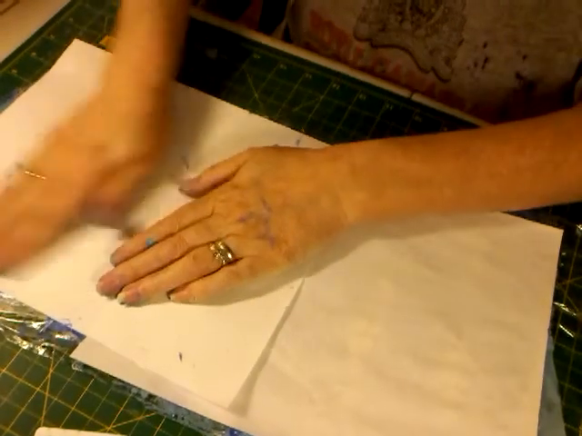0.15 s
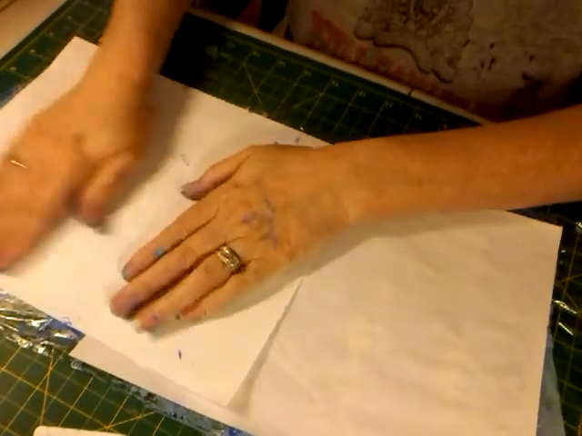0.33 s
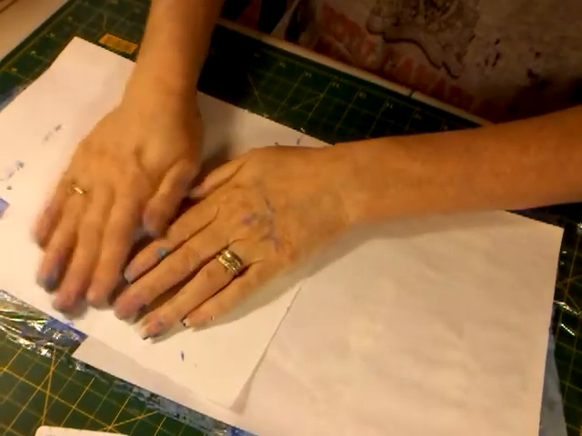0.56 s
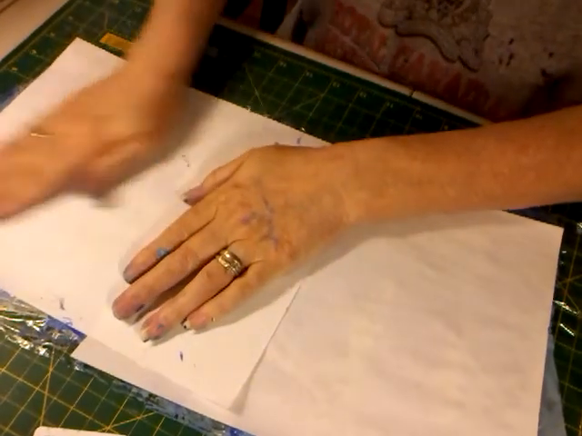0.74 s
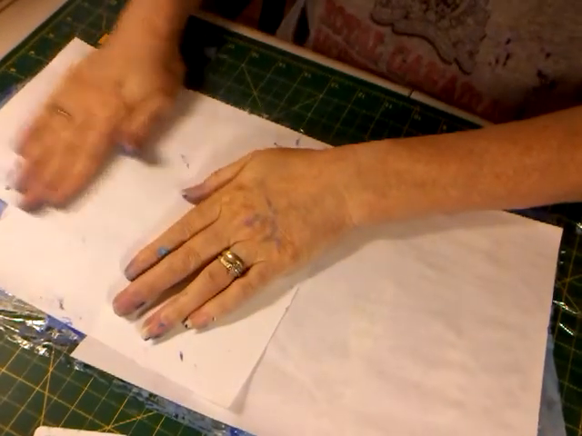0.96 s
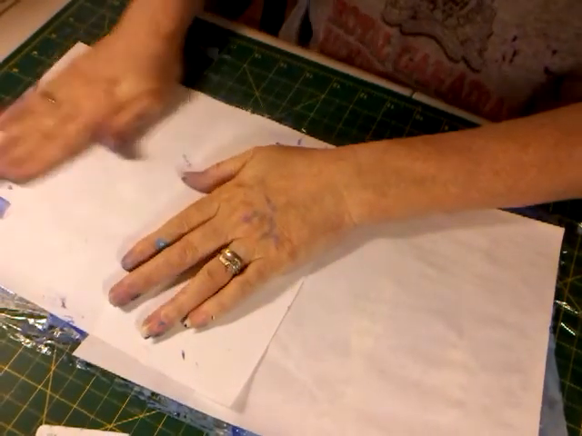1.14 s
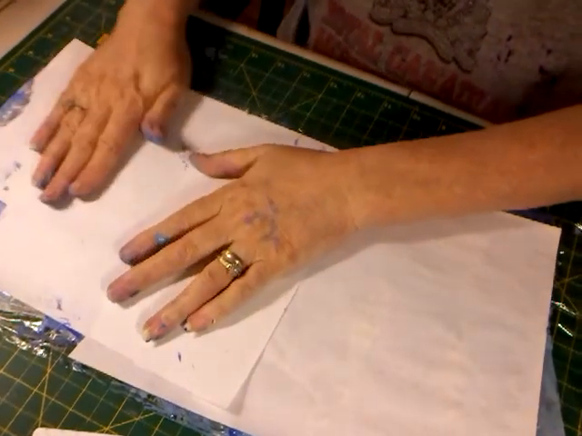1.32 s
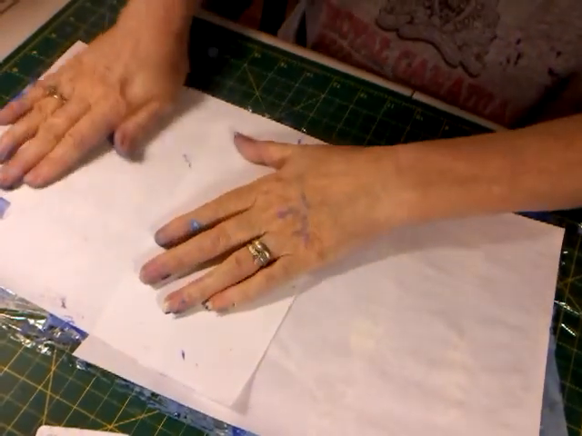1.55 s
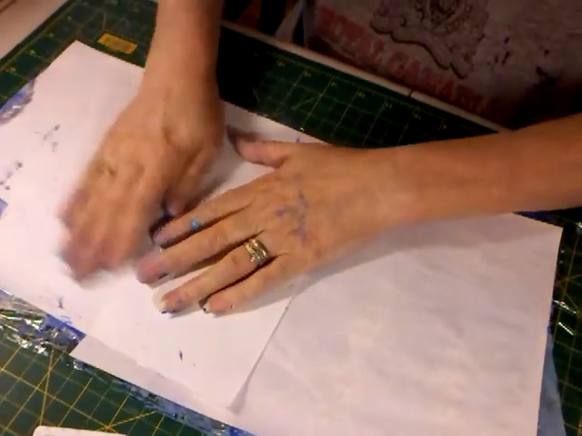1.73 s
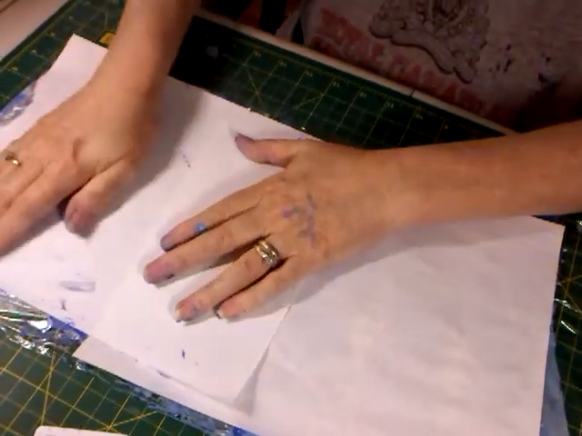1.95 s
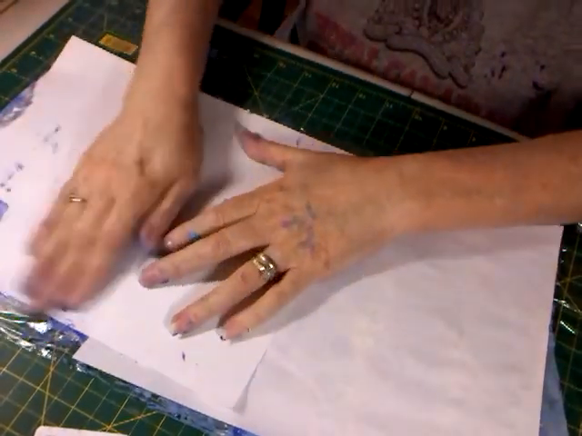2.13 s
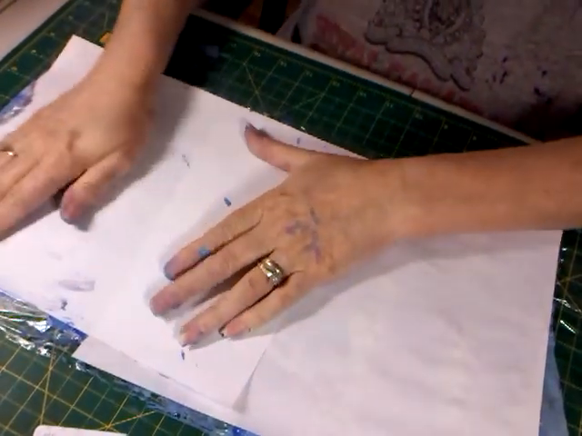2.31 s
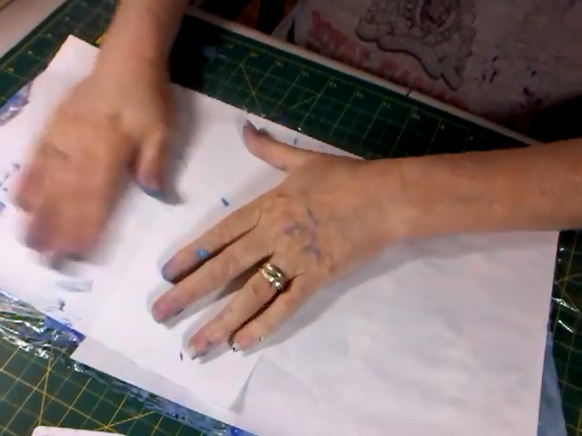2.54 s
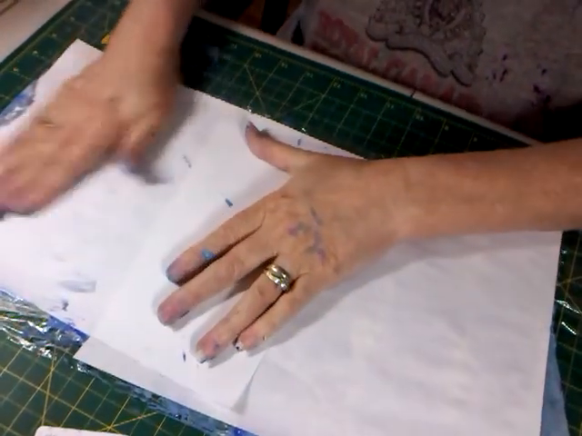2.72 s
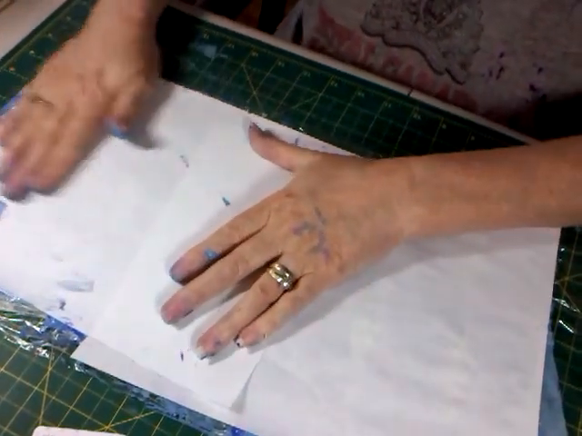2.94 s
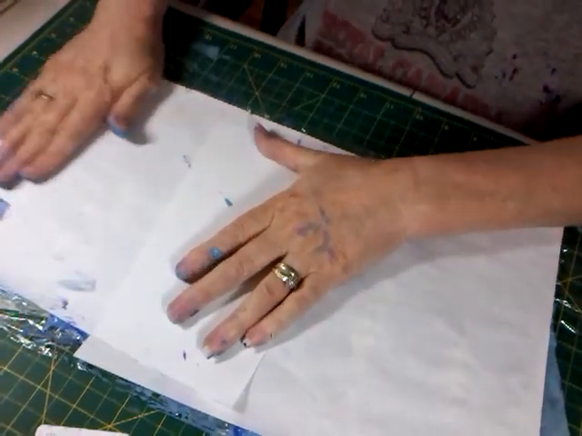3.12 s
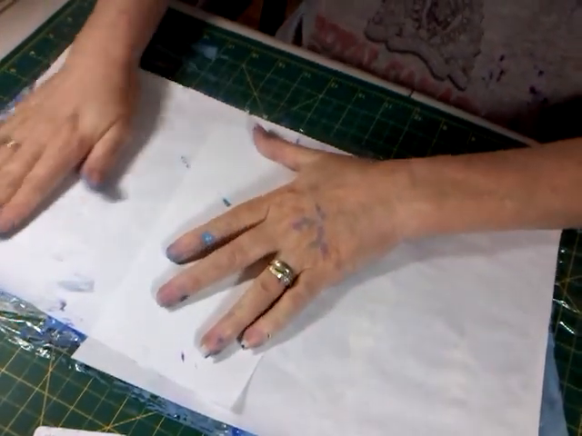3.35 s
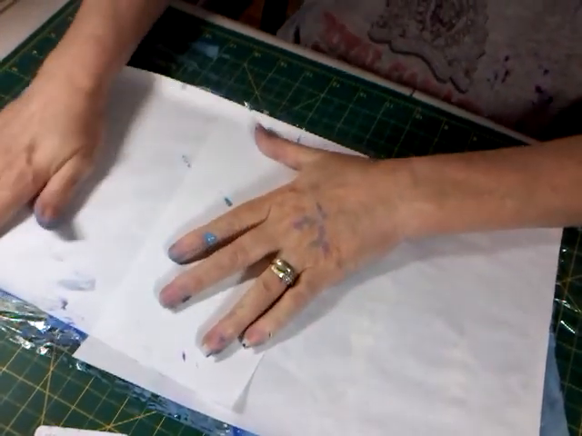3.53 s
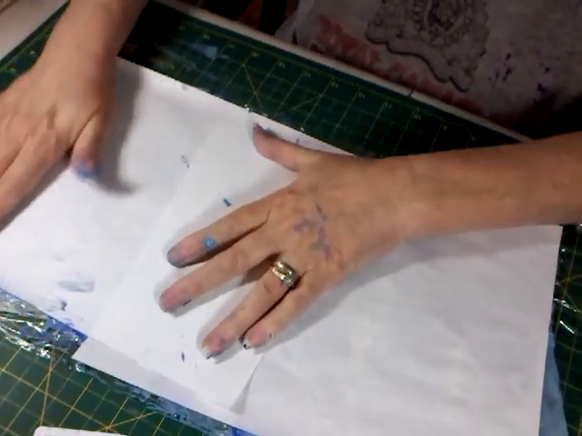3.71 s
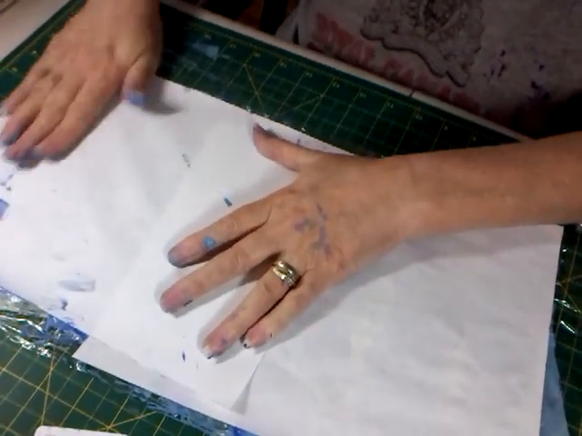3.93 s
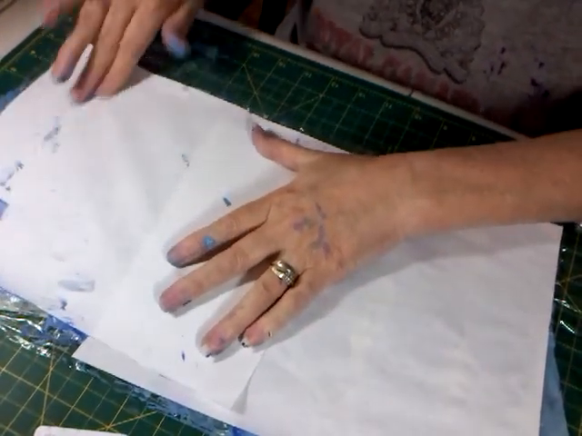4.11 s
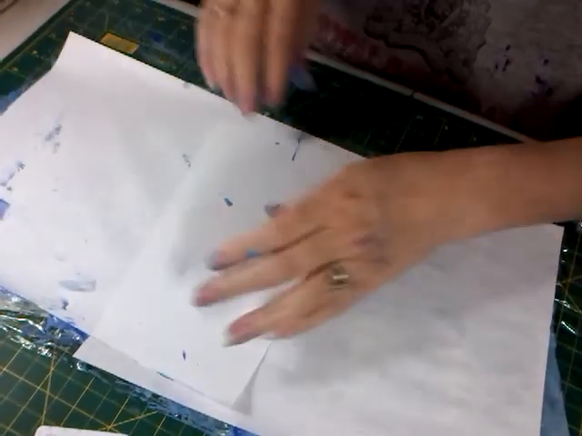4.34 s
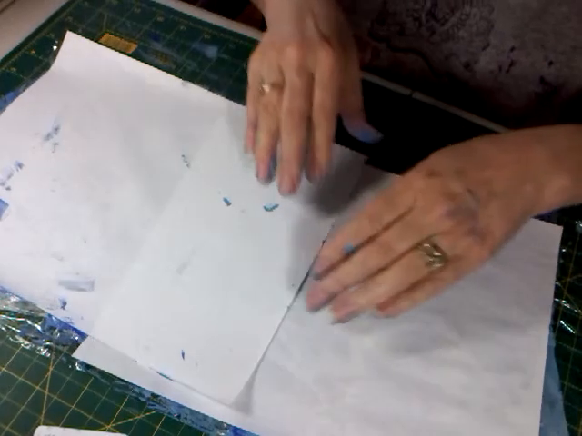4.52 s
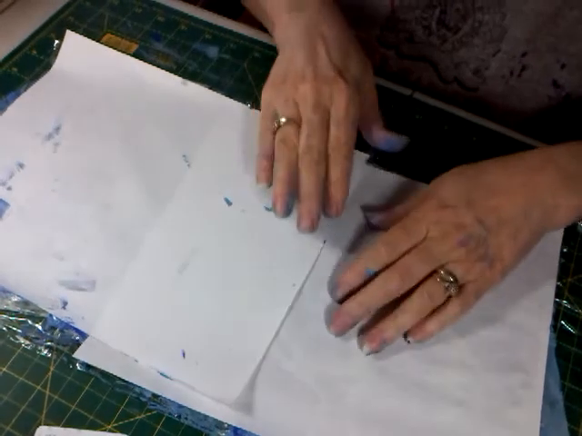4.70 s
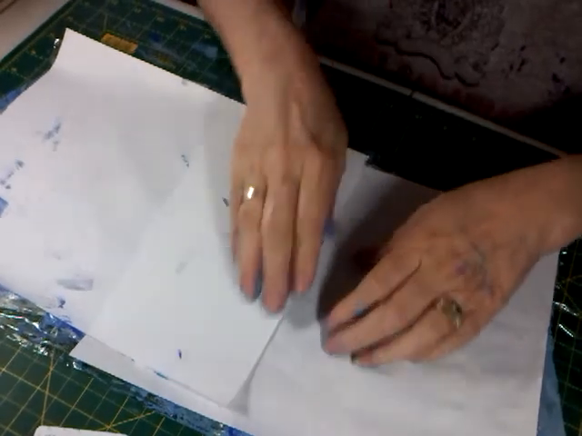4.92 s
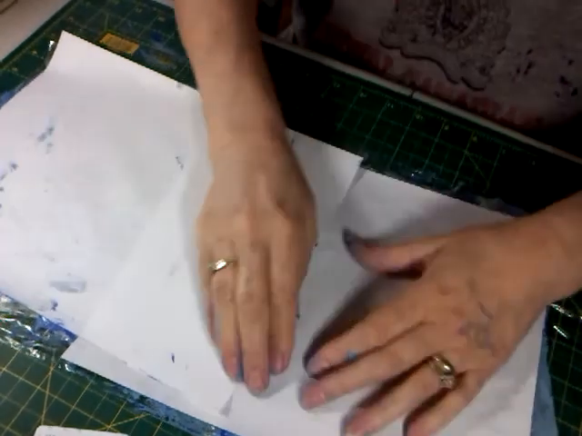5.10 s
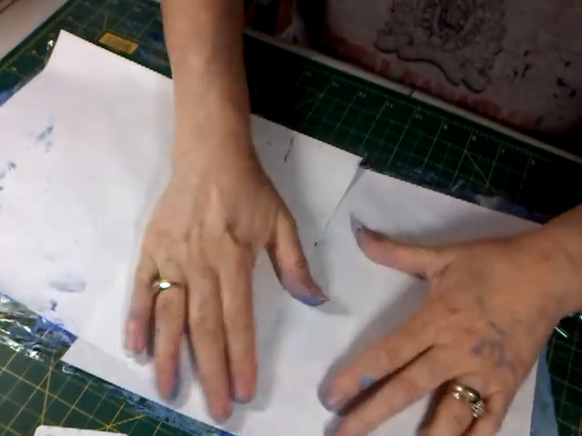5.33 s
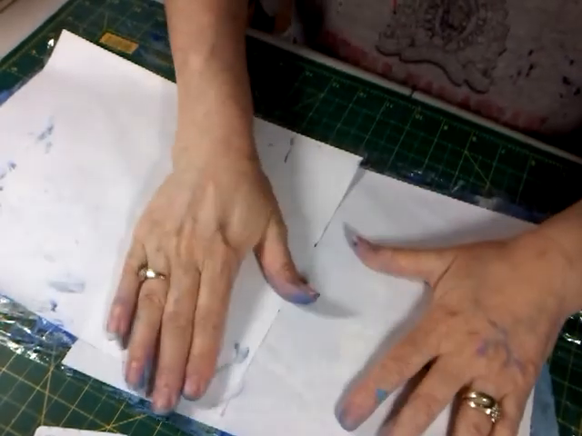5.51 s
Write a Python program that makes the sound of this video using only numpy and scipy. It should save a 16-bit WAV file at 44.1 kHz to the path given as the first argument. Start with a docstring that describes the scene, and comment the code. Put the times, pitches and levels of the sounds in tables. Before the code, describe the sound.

Heard from close by in a quiet room, a hand sweeps briskly back and forth over paper on a table, each stroke a bright, grainy hiss with a faintly hollow tone. The rubbing grows softer and dies away after about four seconds. In the lull come dull, gentle bumps of the hands and a little cluster of paper ticks against plastic, before several lighter smoothing swishes.

```python
"""At a craft table, a palm rubs a sheet of paper down onto painted plastic wrap.
Quick strokes, then long slow ones: skin catching on fibres hisses and scrapes, the hollow under
the hand rings, the dragged sheet drums on the table. The hands lift, touch the paper with small
ticks and soft thumps, and smooth it again. Two close microphone ports ring at different treble pitches."""
import sys
import numpy as np
from scipy import signal
from scipy.fft import rfft, irfft, next_fast_len
from scipy.io import wavfile
from scipy.ndimage import uniform_filter1d, map_coordinates

SR = 44100
rng = np.random.default_rng(int(sys.argv[2]) if len(sys.argv) > 2 else 0)


def master(y):
    """Save y as 16-bit WAV."""
    cut = np.clip(np.atleast_2d(y).T, -1, 1)
    pcm = np.round(cut * 32767)  # scale
    wavfile.write(sys.argv[1], SR, pcm.astype(np.int16))


N = 249606

# palm strokes: fastest_s, rise_s, fall_s, hiss_db, scrape_db, hollow_db, brightness_db
PALM_STROKES = [ (0.079, .115, 0.088, -30.5, -45, -56, 2), (.311, 0.073, 0.025, -34.5, -51.5, -64, 5.5),
                (.448, 0.086, .056, -32, -47.5, -55, 3), (0.622, .084, 0.031, -31, -47.5, -53.5, 2.5),
                (0.78, 0.11, 0.05, -31.5, -46.5, -54.5, 3), (0.918, 0.068, .048, -31, -46.5, -51.5, 2),
                (1.127, 0.17, 0.059, -34.5, -48, -55, 2), (1.332, 0.091, 0.048, -35.5, -49, -62.5, 1.5),
                (1.549, .135, 0.074, -37, -51.5, -62, 0.5), (1.823, 0.1, 0.056, -34, -56, -63, 3),
                (1.952, .062, 0.14, -36.5, -51.5, -58, 4), (2.227, 0.085, 0.033, -33.5, -53, -58, 3.5),
                (2.386, 0.11, 0.068, -35, -50, -57, 3), (2.561, 0.068, 0.056, -32.5, -47, -55, 1.5),
                (2.726, .091, 0.05, -32.5, -47.5, -57, 2.5), (2.881, 0.066, 0.05, -35, -47.5, -56.5, 3.5),
                (3.091, 0.12, 0.05, -36, -50, -58, 2.5), (3.275, 0.045, 0.047, -43.5, -57, -66, 4.5),
                (3.456, 0.12, 0.12, -42.5, -62, -73, 5), (3.604, 0.21, 0.047, -40.5, -51.5, -56.5, 3),
                (3.85, 0.11, 0.11, -39, -52, -63, 2.5), (3.95, .06, 0.1, -40.5, -55, -64, 2.5),
                (4.095, 0.11, 0.081, -42, -54, -70, 2.5), (4.255, 0.094, 0.034, -46.5, -63.5, -76, 3.5),
                (4.385, 0.071, 0.077, -55.5, -73, -87, 4.5), (4.88, 0.11, 0.065, -61.5, -75, -86, 5),
                (4.96, .03, 0.04, -54, -72, -80, 4), (5.035, .05, .05, -60, -70.5, -82, 8),
                (5.09, 0.019, 0.036, -43, -68, -76, 5), (5.14, .018, 0.15, -43, -63, -71, 1.5),
                (5.262, .033, 0.08, -39, -53.5, -64.5, 5), (5.424, 0.11, .038, -40, -57, -66, 1.5),
                (5.526, 0.086, 0.071, -40, -56, -67, 1), (5.685, 0.07, .064, -46.5, -62.5, -72, 4)]
# low rush of the dragged sheet: time_s, level_db
DRAG_LEVELS = [(0, -51), (.13, -51), (.22, -60), (.34, -58.5), (1.5, -60), (2.5, -58.5), (3.1, -60),
               (4.2, -60.5), (4.68, -66.5), (5.03, -65.5), (5.25, -59), (5.66, -59.5)]
# paper ticks under the fingers: start_s, force_db, t60_s
PAPER_TICKS = [(0.0704, -13, 0.056), (4.5306, -51, 0.045), (4.7546, -42, 0.032), (4.772, -35.5, 0.082),
               (5.005, -50, 0.05), (5.0764, -32, 0.05), (5.096, -26, 0.054), (5.1267, -29, 0.04),
               (5.135, -25, 0.06), (5.5074, -36, 0.05)]
# hands landing: start_s, thud_db, pat_db, t60_s
HAND_BUMPS = [(.019, -51, -44, 0.35), (0.583, -56, -68, 0.18), (1.15, -65, -54, .16),
              (1.796, -47, -68, 0.14), (3.154, -55, -72, .14), (3.196, -59, -72, .14),
              (3.671, -55, -75, .16), (4.281, -56, -72, 0.18), (4.314, -58, -77, 0.22),
              (4.448, -55, -74, .11), (4.775, -55, -60, 0.17), (4.829, -66, -73, .18),
              (4.98, -54.5, -66, .22), (5.069, -53, -66, .18), (5.127, -52, -51.5, 0.16)]
# arms shifting weight: peak_s, rise_s, fall_s, rumble_db
ARM_SHIFTS = [(.63, 0.07, 0.044, -66), (4.45, 0.16, 0.16, -61.5), (4.9, 0.24, 0.42, -63.5),
              (5.64, .12, .1, -64)]

# source spectra: freq_hz, density_db
HISS_SPECTRUM = [(1500, -48), (3000, -24), (4500, -2), (6500, 0.5), (9000, -2.5), (12000, -4.5),
                 (14500, -8)]
SCRAPE_SPECTRUM = [(500, -37), (900, -23), (1300, -16), (2050, -11.5), (2550, -2), (2830, -2.5),
                   (3120, -0.5), (3600, -0.5), (4200, -1.5), (5500, -19), (9000, -52)]
HOLLOW_SPECTRUM = [(500, -81), (950, -16), (1250, -8), (1400, 1), (1530, 2.5), (1650, -3.5), (1850, -10.5),
                   (2400, -11), (5000, -45)]
DRAG_SPECTRUM = [(30, -36), (80, -17), (140, -5), (260, -4.5), (380, -.5), (560, -5), (800, -8.5),
                 (1200, -9), (2500, -16), (5000, -29.5)]
SNAP_SPECTRUM = [(300, -11), (2500, -11), (4500, 7), (7000, 6), (14000, -5)]
THUD_SPECTRUM = [(30, -21), (70, 3.5), (130, 1.5), (200, -6), (400, -20), (1500, -54), (4000, -72)]
PAT_SPECTRUM = [(40, -25), (120, -2), (350, -1.5), (700, -7.5), (1500, -14), (3000, -22), (6000, -45)]
RUMBLE_SPECTRUM = [(20, -7), (45, -3), (80, -2), (130, -6.5), (220, -18), (600, -41), (2000, -80)]
ROOM_SPECTRUM = [(15, -33), (25, -16), (87, -5), (129, -3), (584, -20), (703, -22), (824, -38),
                 (14000, -29.5)]
# bands whose gain varies with the hiss level: freq_hz, share
HISS_TOP_BAND = [(6200, 0.039), (9000, 1)]
MID_DIP_BAND = [(350, 0.15), (650, 0.86), (1100, 0.84), (1500, 0.47)]
# colour of the reflections and of the right port: freq_hz, gain_db
ECHO_EQ = [(3000, 4.7), (7000, 0.5)]
RIGHT_PORT_EQ = [(1500, -3), (2800, -1), (6500, -2.5), (10000, -6)]
# port resonances, left then right: pitch_hz, width_hz, strength_db
PORT_RESONANCES = [(7480, 1780, 5), (5920, 630, 13)]
# left-right likeness: freq_hz, correlation
PORT_CORRELATION = [(25, -0.52), (65, -0.96), (200, -0.44), (450, -0.38), (800, 0.043), (1550, 0.01),
                    (1900, 0.2), (2900, 0.32), (4200, -0.07), (5500, 0.042)]

HISS_EDGE_DB, BAND_LIMIT_HZ = 9.5, 14620
BELL_EXPONENT = 1.79  # lower: sharper peak, longer skirts


def rubbing(grain=0.46, judder_db=0.65, pan_db=0.6):
    """Dry friction of the palm: a faster stroke is louder, denser and brighter."""
    hiss_db, scrape_db, _, bright_db = np.transpose(PALM_STROKES)[3:]
    effort_db = stroke_effort_db()
    hiss_gain = swells(PALM_STROKES, hiss_db, HISS_EDGE_DB)
    brightness = swells(PALM_STROKES, hiss_db + bright_db, HISS_EDGE_DB) / hiss_gain
    judder = amp(judder_db * wobble(rate_hz=70))
    fibres = lambda: white() + grain * slips(rate_hz=1500 * amp(effort_db / 2), life_s=0.00082)
    hiss = at_ports(roaming(fibres(), depth_db=1.57), HISS_SPECTRUM)
    top = filtered(hiss, lambda hz: along(HISS_TOP_BAND, hz))
    hiss += top * (brightness * amp(0.21 * effort_db) - 1)
    scrape = at_ports(roaming(fibres(), depth_db=3), SCRAPE_SPECTRUM)
    friction = hiss_gain * hiss + swells(PALM_STROKES, scrape_db, edge_db=7) * scrape
    balance_db = pan_db * (0.5 - np.arange(N) / N)  # the hand drifts left to right
    return judder * friction * amp([balance_db / 2, -balance_db / 2])


def slips(rate_hz, life_s):
    """Skin catches on paper fibres: tiny bursts of uneven size."""
    catches = (rng.random(N) < rate_hz / SR) * rng.uniform(0.46, 1, N)
    energy = signal.lfilter([1], [1, -np.exp(-1 / (life_s * SR))], catches / rate_hz)
    return unit_rms(np.sqrt(energy) * white())


def roaming(pair, depth_db):
    """The palm covers ever new parts of the sheet, so narrow bands swell and fade."""
    bands = signal.stft(pair, nperseg=1024)[2]
    field = rng.standard_normal(bands.shape[1:])
    field = uniform_filter1d(field, size=5, axis=0)  # over frequency
    field = uniform_filter1d(field, size=8, axis=1)  # over time
    return signal.istft(bands * amp(depth_db * unit_rms(field)), nperseg=1024)[1][:, :N]


def stroke_effort_db():
    """Briskness of the palm: hiss level relative to its median."""
    hiss_db = np.transpose(PALM_STROKES)[3]
    level_db = 20 * np.log10(swells(PALM_STROKES, hiss_db, HISS_EDGE_DB))
    return level_db - np.median(level_db)


def hand_hollow():
    """The hollow under the hand rings with each stroke."""
    hollow_db = np.transpose(PALM_STROKES)[5]
    ring = at_ports(roaming(white(), depth_db=4), HOLLOW_SPECTRUM)
    return swells(PALM_STROKES, hollow_db, edge_db=7) * ring


def sheet_drag(gain_db=2, lumpy_db=1.5, dip_above_db=3.5):
    """The dragged sheet drums on the table. A low rush; its midrange dips while the hiss is loudest."""
    time_s, level_db = np.transpose(DRAG_LEVELS)
    drag_db = np.interp(np.arange(N) / SR, time_s, level_db)
    hiss_db = stroke_effort_db()
    drumming = roaming(white(), depth_db=3) * amp(lumpy_db * wobble(rate_hz=35))
    rush = at_ports(drumming, DRAG_SPECTRUM)
    mids = filtered(rush, lambda hz: along(MID_DIP_BAND, hz))
    mid_dip_db = -2.8 * np.maximum(hiss_db - dip_above_db, 0)
    rush += mids * (amp(mid_dip_db) - 1)
    follow_db = 0.18 * np.minimum(hiss_db, 0)
    return amp(drag_db + gain_db + follow_db) * rush


def ticks(gain_db=-11, ceiling_db=-38):
    """Paper snaps against the plastic; harder presses flatten into a crunch."""
    snap = at_ports(white(), SNAP_SPECTRUM)
    force = amp(gain_db) * blows(PAPER_TICKS, attack_s=0.00046)
    return amp(ceiling_db) * np.tanh(force / amp(ceiling_db)) * snap


def bumps(gain_db=-1):
    """Soft flesh on a padded table thuds with no ring; a flat landing adds a pat."""
    start_s, thud_db, pat_db, t60_s = np.transpose(HAND_BUMPS)
    thuds = blows(zip(start_s, thud_db, t60_s), attack_s=0.002) * at_ports(white(), THUD_SPECTRUM)
    pats = blows(zip(start_s, pat_db, t60_s), attack_s=0.0012) * at_ports(white(), PAT_SPECTRUM)
    return amp(gain_db) * (thuds + pats)


def table_rumble(resting_db=-80):
    """The table rumbles faintly as the arms shift their weight."""
    rumble_db = np.transpose(ARM_SHIFTS)[3]
    gain = amp(resting_db) + swells(ARM_SHIFTS, rumble_db, edge_db=10)
    return gain * at_ports(white(), RUMBLE_SPECTRUM)


def reflections(direct, gain_db=-12, count=24):
    """Nearby surfaces return weak, dull copies, different at each port."""
    delays_s = rng.uniform(0.002, 0.022, (count, 2))
    signs = rng.choice([-1, 1], (count, 2))
    taps = np.zeros((2, SR // 10))
    taps[[0, 1], (delays_s * SR).astype(int)] = signs * amp(gain_db) / np.sqrt(count)
    copies = signal.fftconvolve(direct, taps, axes=1)[:, :N]
    return filtered(copies, lambda hz: amp(along(ECHO_EQ, hz)))


def room(level_db=-65):
    """Faint steady rumble and hiss."""
    return amp(level_db) * at_ports(white(), ROOM_SPECTRUM)


def port_response(hz):
    """Each port lifts its own treble band; the right is weaker at both ends."""
    left, right = [1 + amp(db) * 1j * hz * width_hz / (pitch_hz ** 2 - hz ** 2 + 1j * hz * width_hz)
                   for pitch_hz, width_hz, db in PORT_RESONANCES]
    return np.array([left, right * amp(along(RIGHT_PORT_EQ, hz))])


def at_ports(pair, spectrum):
    """Two independent noises, coloured and mixed into the ports at rms 1."""
    def mid_side_gains(hz):
        angle_rad = np.arccos(along(PORT_CORRELATION, hz)) / 2
        return amp(along(spectrum, hz)) * np.array([np.cos(angle_rad), np.sin(angle_rad)])
    mid, side = filtered(pair, mid_side_gains)
    return unit_rms(filtered(np.array([mid + side, mid - side]), port_response))


def swells(moves, levels_db, edge_db):
    """Gain of overlapping movements: bells, edge_db down at rise_s before and fall_s after the peak."""
    time_s = np.arange(0, N, 64) / SR
    peak_s, rise_s, fall_s = np.transpose(moves)[:3, :, None]
    away = np.abs(time_s - peak_s) / np.where(time_s < peak_s, rise_s, fall_s)
    bells = amp(levels_db[:, None] - edge_db * away ** BELL_EXPONENT)
    return np.interp(np.arange(N) / SR, time_s, np.linalg.norm(bells, axis=0)) + 1e-6


def blows(events, attack_s):
    """Envelope that jumps at each event and decays."""
    age_s = np.arange(SR // 3) / SR
    envelope = np.zeros(N + SR)
    for start_s, peak_db, t60_s in events:
        shape = (1 - np.exp(-age_s / attack_s)) * amp(-60 * age_s / t60_s)
        envelope[round(start_s * SR):][:len(shape)] += amp(peak_db) * shape / shape.max()
    return envelope[:N]


def wobble(rate_hz):
    """Smooth curve through random knots."""
    knots = rng.standard_normal(int(N * rate_hz / SR) + 4)
    return map_coordinates(knots, [np.arange(N) * rate_hz / SR])


def white():
    """Two independent white noises."""
    return rng.standard_normal((2, N))


def filtered(x, response):
    """Apply response(hz) to x."""
    size = next_fast_len(N + 8192)
    return irfft(rfft(x, size) * response(np.fft.rfftfreq(size, 1 / SR)), size)[..., :N]


def along(points, hz):
    """Interpolate (freq_hz, value) points on a log axis."""
    freq_hz, values = np.transpose(points)
    return np.interp(np.log(hz + 1), np.log(freq_hz + 1), values)


def amp(db):
    """Decibels to gain."""
    return 10 ** (np.asarray(db) / 20)


def unit_rms(x):
    """Scale to rms 1."""
    return x / np.sqrt(np.mean(x ** 2) + 1e-20)


def scene():
    """Everything at the table, from close by."""
    direct = rubbing() + hand_hollow() + sheet_drag() + table_rumble() + bumps() + ticks()
    return direct + reflections(direct) + room()


def record(dry):
    """Brick-wall low-pass at the band limit."""
    return filtered(dry, lambda hz: hz < BAND_LIMIT_HZ)


dry = scene()
out = record(dry)
master(out)
```